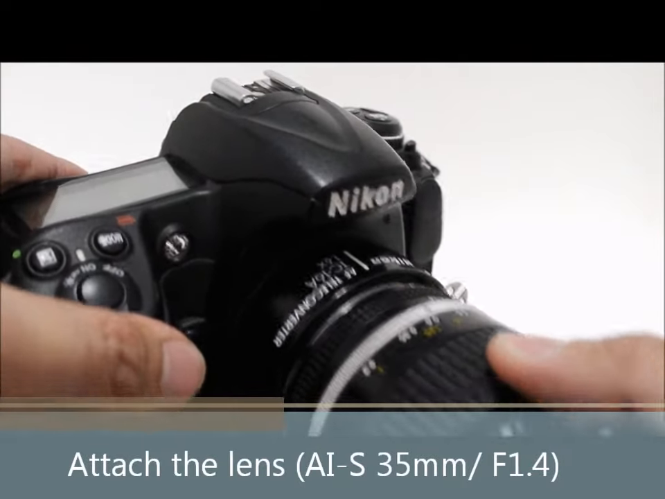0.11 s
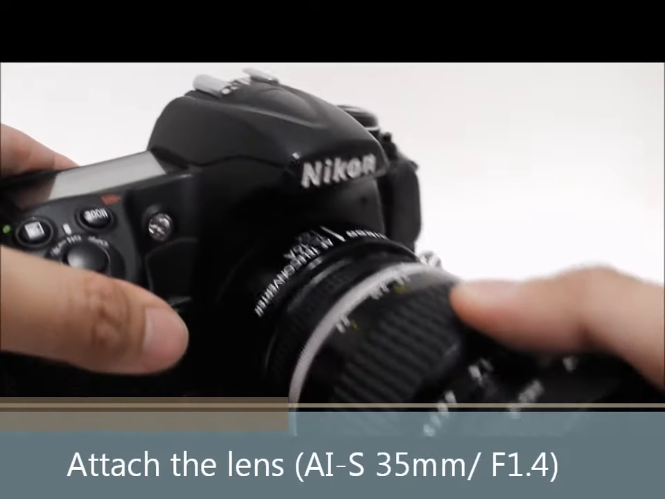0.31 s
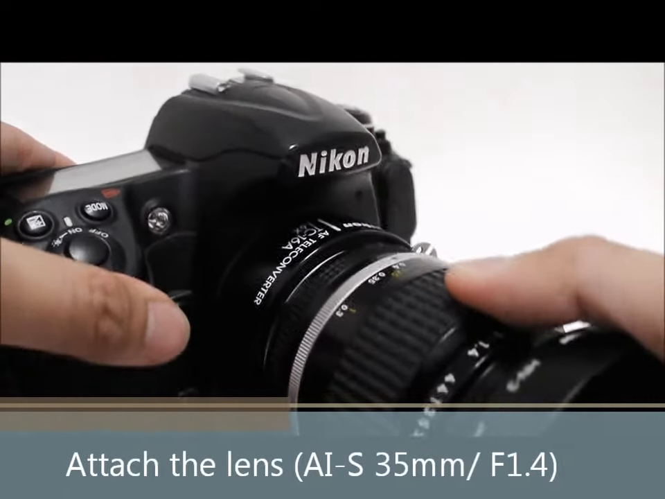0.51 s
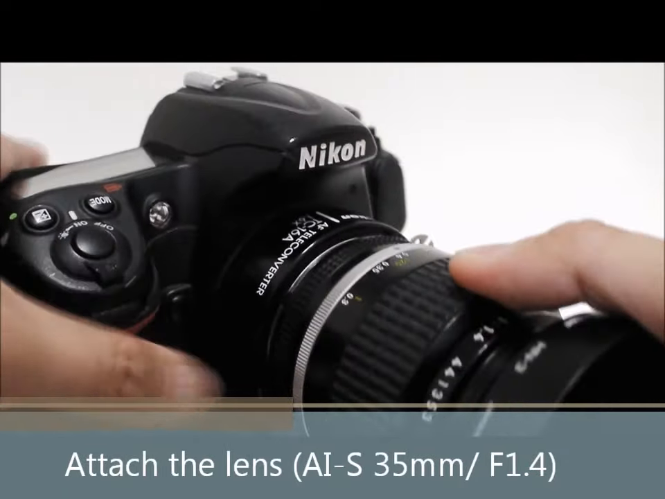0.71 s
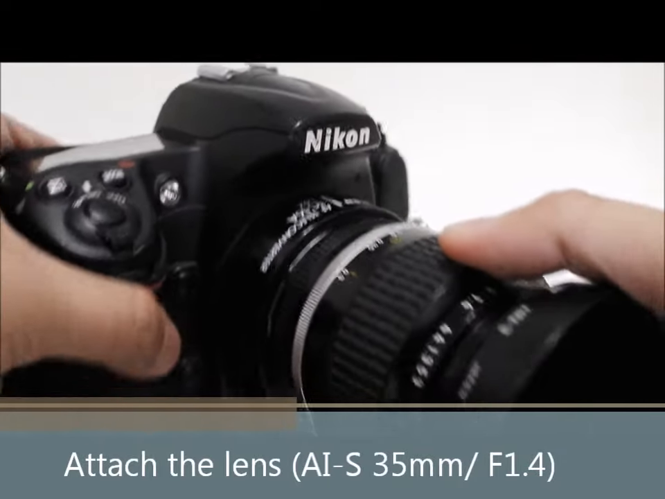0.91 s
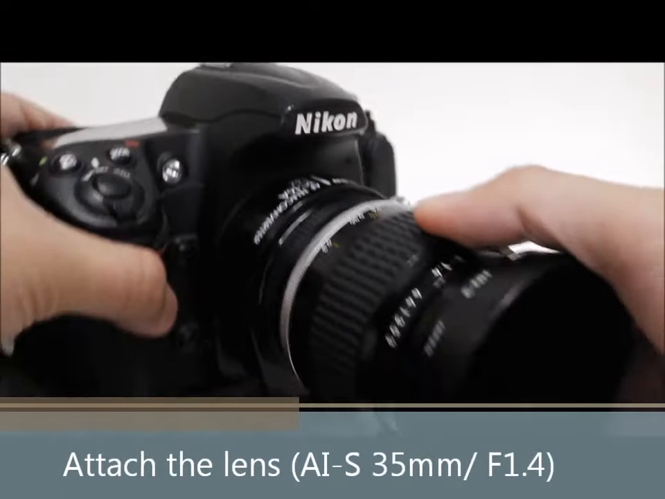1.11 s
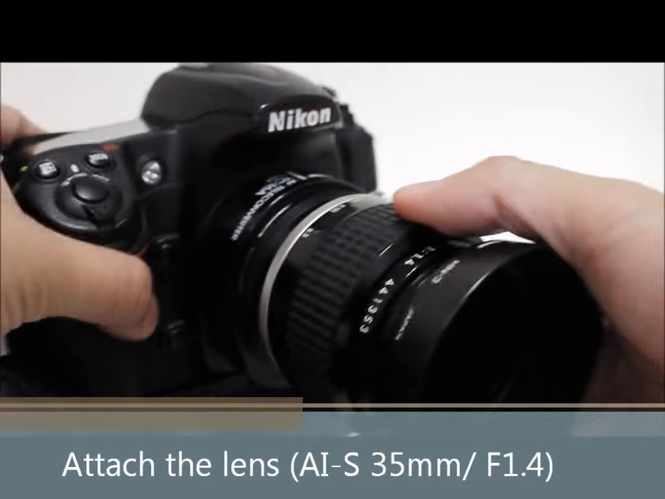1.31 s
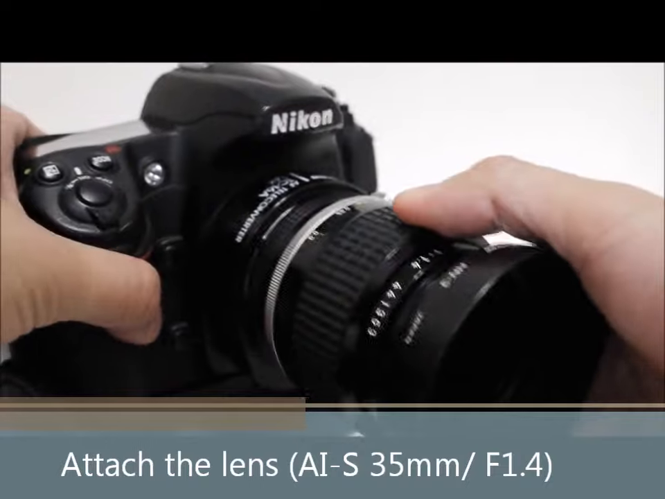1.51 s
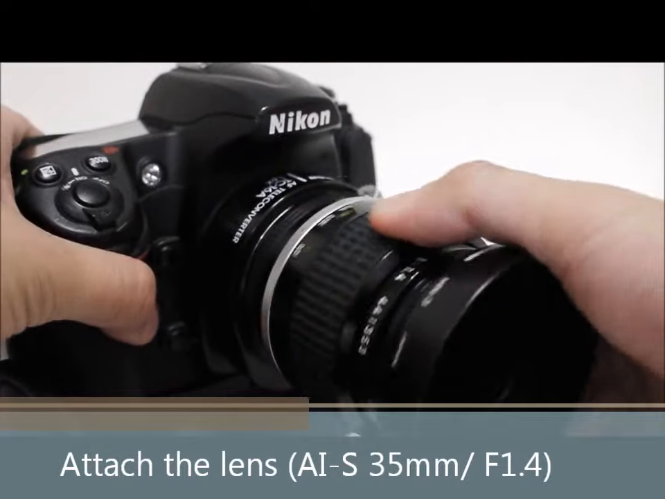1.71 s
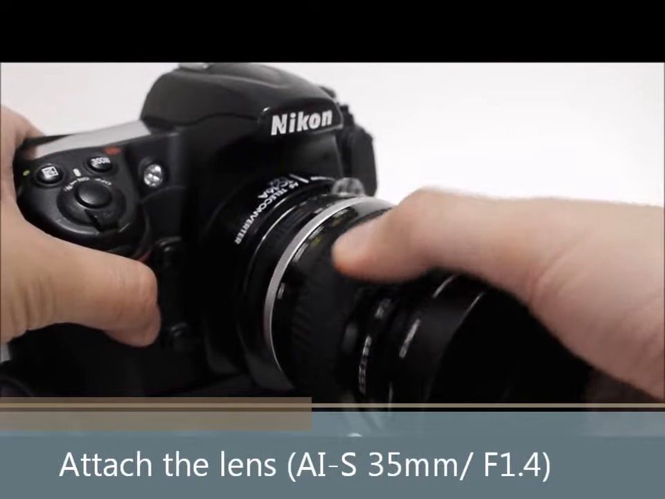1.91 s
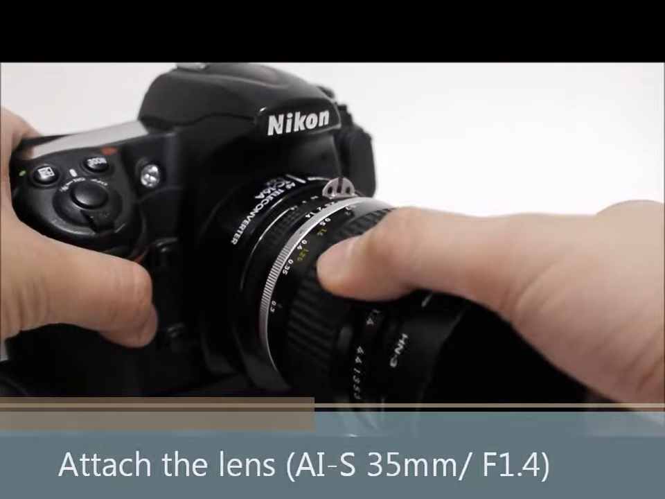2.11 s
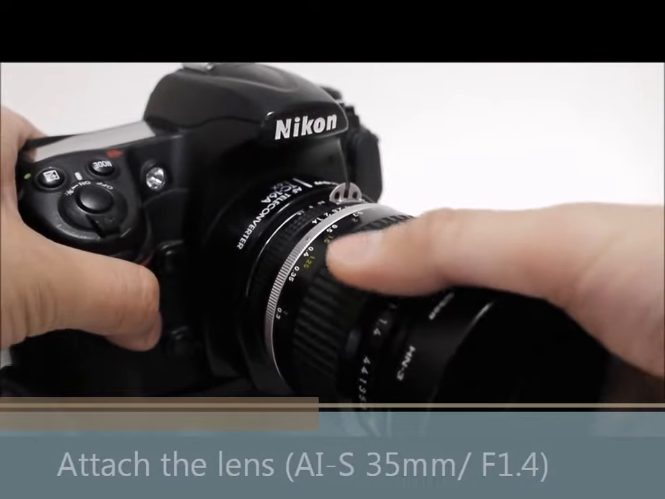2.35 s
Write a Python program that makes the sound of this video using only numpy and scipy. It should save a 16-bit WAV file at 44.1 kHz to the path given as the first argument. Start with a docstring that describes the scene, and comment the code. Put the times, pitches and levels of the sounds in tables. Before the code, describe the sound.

A metal camera lens meets its mount with a loud sharp clack, then faint ticks, a short gritty twisting scrape, a latch click and a final stop click, close-miked in a small quiet room.

```python
"""Short chattering clicks of metal parts meeting, as a lens is seated on a camera's bayonet mount and twisted home.
Each click is an enveloped flurry of impacts, filtered by its part, plus decaying body modes and a room echo.
The flange and then a ring scrape as they turn: filtered stick-slip noise, with short bright swells of scraping.
Fingers shift their grip on the housing in dull resonant rubs of the same friction noise.
Behind them lies the soft hiss of a small quiet room: steady filtered noise."""
import sys
import numpy as np
from scipy import signal
from scipy.fft import rfft, irfft
from scipy.io import wavfile
from scipy.ndimage import uniform_filter1d, map_coordinates

SR = 44100
rng = np.random.default_rng(int(sys.argv[2]) if len(sys.argv) > 2 else 0)


def file_out(sig):
    """Save sig as 16-bit WAV at sys.argv[1]."""
    # one column per channel
    cols = np.atleast_2d(sig).T
    # limit, then scale
    lim = np.clip(cols, -1, 1)
    pcm = np.round(lim * 32767).astype(np.int16)
    wavfile.write(sys.argv[1], SR, pcm)


N = 110250
T = np.arange(N) / SR

# impacts of the parts: (time [s], part, level [dB], rise [ms], hold [ms], decay to 1/e [ms],
# body ring re impact [dB], room echo re impact [dB])
IMPACTS = [(.2118, "edge", -37.5, 2.8, 2.1, 0.89, -9, 2), (0.2175, "flange", -18, 1.37, 0.11, 2.4, -7, -13),
           (.2222, "flange", -32.5, 0.62, 2.4, 3.3, -10, -3),
           (0.4835, "edge", -50.5, 0.49, 2.7, 3.2, -35, -23),
           (0.5545, "barrel", -55, 1.3, 1.2, 4.1, -20, -26),
           (0.5635, "edge", -52.5, 0.89, 1.4, 1.2, -24, -22),
           (0.6180, "lug", -48.5, 1.1, 2.2, 6.4, -31, -7),
           (0.6557, "barrel", -49, 1.2, 3.6, 4.4, -36, -3.5),
           (0.714, "housing", -46.5, 2.2, 3.6, 5.7, -30, -3.5),
           (1.1833, "latch", -36, 0.78, 0.52, 4.4, -11.5, -5),
           (1.3254, "housing", -45.5, 2.46, 0.98, 2.16, -3, 1.5),
           (1.3345, "barrel", -47.5, 0.85, 3.2, 1.1, -29, -2),
           (1.4552, "edge", -56.5, 0.78, 1.7, 3.1, -14, -17),
           (1.5748, "ring", -54.5, 0.95, 2.1, 2.1, -20, -0.5),
           (1.7888, "ring", -37.5, 1.1, 1.18, 2.9, -18, -3.5),
           (2.2042, "stop", -33, 1.7, 0.81, 2.55, -7.5, -2),
           (2.2596, "pin", -42, 1.06, 1.6, 0.93, -23, -8.5)]
# relative spectral density of each part's impact: part -> (frequency [Hz], level [dB])
IMPACT_COLOURS = { "flange": [(90, -20), (180, -17), (400, -0.5), (620, -6.5), (1100, -3), (1600, 3.5),
                  (1950, 4), (2250, -12), (2660, -2.5), (3100, -10), (4800, -17), (6800, -11), (7700, -15),
                  (10800, -10.5), (15300, -16.5)], "latch": [(150, -31), (450, -2), (720, 6), (966, 2),
                  (2100, -2), (3160, -7), (4140, -11.5), (6900, -13), (9900, -11.5), (15500, -29)],
                  "ring": [(100, -17), (250, -0.5), (900, -2.5), (3300, 0), (7400, -8), (11000, -14.5),
                  (15500, -14)], "stop": [(80, -30), (200, -2), (446, -3), (700, -3), (980, 5), (1340, -9),
                  (1750, -1.5), (2700, -12), (3500, -9), (5380, -14), (8300, -17.5), (15500, -40)],
                  "lug": [(150, -28), (800, -10), (2000, 5.5), (7700, -6.5), (9600, -3.5), (15500, -13)],
                  "pin": [(150, -17), (1900, 4.5), (2750, -6), (3400, 4.5), (5800, -10), (8300, -12.5),
                  (15500, -25)], "edge": [(150, -13), (550, -9), (1700, -3), (3100, -2.5), (5500, -5),
                  (9000, -17), (15500, -18)], "barrel": [(150, -25), (400, -9), (850, 1.5), (1700, -6.5),
                  (3000, -11), (6000, -35), (15500, -29)], "housing": [(150, -18), (400, -2), (900, 10.5),
                  (1800, 1), (2800, -6.5), (4500, -6), (5400, -34), (15500, -34)]}
# resonances of each part: part -> (frequency [Hz], width [Hz], rise [dB])
PART_RESONANCES = { "flange": [(412, 70, 6), (522, 60, 6), (778, 80, 9), (6676, 180, 7), (7220, 160, 8),
                   (10840, 300, 5)], "latch": [(710, 70, 9), (1490, 260, 9), (4820, 300, 13),
                   (6900, 550, 10)], "ring": [(3380, 160, 6), (6220, 300, 13), (8750, 250, 7),
                   (9950, 160, 11)], "stop": [(935, 100, 6), (1820, 260, 9), (2300, 170, 8),
                   (3330, 260, 10), (3830, 200, 5.5), (4560, 300, 9)], "lug": [(3350, 300, 14),
                   (4750, 300, 7), (5420, 300, 8), (6340, 280, 8)], "pin": [(1760, 160, 8), (3860, 90, 10)],
                   "edge": [(880, 200, 13), (1670, 180, 7), (3320, 200, 6), (5450, 250, 5)],
                   "barrel": [(1020, 140, 4), (2300, 250, 4)], "housing": [(2310, 180, 11), (2800, 160, 8),
                   (3300, 220, 11), (4420, 400, 9)]}


def clicks(size=16384):
    """Impact excitation: each contact force drives its part, with body modes and a diffuse echo added."""
    out = np.zeros(N + size)
    t = T[:size]
    ms = t * 1000
    for start_s, part, db, rise, hold, decay, ring_db, room_db in IMPACTS:
        attack = np.minimum(ms / rise, 1)
        env = attack * np.exp(-np.maximum(ms - rise - hold, 0) / decay)
        hit = unit(colour(chatter(env), IMPACT_COLOURS[part], PART_RESONANCES[part]))
        ring = body(t)
        echo = unit(signal.fftconvolve(hit, room())[:size])
        start = int(start_s * SR)
        strength = undb(db) * np.sqrt(np.mean(env ** 2))
        out[start:start + size] += strength * (hit + undb(ring_db) * ring + undb(room_db) * echo)
    return out[:N]


def chatter(env, count=5):
    """Repeated micro-impact: a flurry of similar strength under an envelope, nearly white in spectrum."""
    x = env * rng.standard_normal(len(env))
    for _ in range(count):
        # flatten the spectrum, then even out the local level
        z = rfft(x)
        x = irfft(z / (np.abs(z) + 1e-12), len(env))
        local_rms = np.sqrt(np.abs(uniform_filter1d(x ** 2, size=32)) + 1e-18)
        x = env * np.tanh(.5 * x / local_rms)
    return x


BUILD_CYCLES = 1.05  # build-up time constant, in cycles of each mode
# modes of camera and lens: (frequency [Hz], relative level [dB], T60 [s])
BODY_MODES = [(154, -8.5, .26), (250, -7, .22), (322, -4, .16), (415, 1, .14), (467, -5, .12),
              (529, -1, .13), (690, -4, .1), (777, 4.5, .12), (931, -6, .12), (1200, -4, .1),
              (1441, -1, .1), (1502, -2, .1), (1663, -2, .09), (1869, -6, .07), (1993, -2, .065)]


def body(t):
    """Modal superposition: each mode swells over its first cycles, then decays exponentially."""
    total = 0
    for hz, db, t60 in BODY_MODES:
        tone = np.sin(2 * np.pi * (hz * t + rng.random()))
        build = 1 - np.exp(-hz * t / BUILD_CYCLES)
        total = total + undb(db) * tone * build * np.exp(-np.log(1000) * t / t60)
    return unit(total)


TWIST_DB, TURN_DB = -3.5, -1  # gains added to the two stroke curves
# flange sliding round in the mount, before TWIST_DB: (time [s], level [dB])
TWIST_STROKE = [(.76, -64), (.82, -55), (.905, -49), (.946, -40.5), (.99, -50.5), (1.04, -47), (1.12, -45),
                (1.178, -50), (1.205, -69)]
# relative spectral density of the flange's scrape: (frequency [Hz], level [dB])
TWIST_SPECTRUM = [(100, -47), (160, -30), (300, -8), (490, -10.5), (751, 4), (1220, -3.5), (3160, -2),
                  (4100, -7.5), (6300, -9.5), (15500, -22.5)]
# resonances that the sliding excites: (frequency [Hz], width [Hz], rise [dB])
TWIST_RESONANCES = [(730, 180, 4), (915, 33, 7), (2460, 130, 5.5), (3210, 190, 4)]
# ring turning on the barrel, before TURN_DB: (time [s], level [dB])
TURN_STROKE = [(1.55, -80), (1.70, -64), (1.81, -59.5), (1.88, -52.5), (1.925, -55), (1.955, -69)]
# relative spectral density of the ring's scrape: (frequency [Hz], level [dB])
TURN_SPECTRUM = [(200, -12.5), (800, -5.5), (1600, 4), (2500, 3.5), (3500, 4), (5000, 2.5), (6700, -1.5),
                 (8000, -3), (11000, -4), (15500, -11)]
# resonances of the turning ring: (frequency [Hz], width [Hz], rise [dB])
TURN_RESONANCES = [(2480, 350, 6), (6700, 670, 4.5)]
# short bright swells of metal scraping, in the ring's colour; the one at .905 s brightens
# the flange's slide: (time [s], length [s], level [dB])
BRIGHT_SWELLS = [(.615, 0.092, -63), (.817, 0.0075, -55), (.905, 0.13, -52.5), (2.27, 0.11, -63)]


def scrapes():
    """Friction-excited resonance: the flange grinds in the mount, the ring turns lightly, bright swells join."""
    twist = drift(colour(friction(), TWIST_SPECTRUM, TWIST_RESONANCES))
    bright = drift(colour(friction(), TURN_SPECTRUM, TURN_RESONANCES))
    bright_gain = stroke(TURN_STROKE) * undb(TURN_DB) + swells(BRIGHT_SWELLS)
    return twist * stroke(TWIST_STROKE) * undb(TWIST_DB) + bright * bright_gain


CATCHES_PER_S, CATCH_SPREAD_DB = 1100, 4  # mean rate; mean of the exponential spread before its cap
SMOOTH_SHARE = 0.78  # share of the power in smooth sliding
JUDDER_HZ, JUDDER_DB = 108, 1.05  # unevenness of the hand's pressure: new values per second, spread


def friction():
    """Stick-slip: dense uneven catches over smooth sliding noise, both juddering with the pressure."""
    caught = rng.random(N) < CATCHES_PER_S / SR
    size_db = CATCH_SPREAD_DB * np.minimum(rng.exponential(size=N), 4)
    catches = caught * rng.choice([-1, 1], N) * undb(size_db)
    smooth = rng.standard_normal(N)
    judder = np.interp(T * JUDDER_HZ, np.arange(N), rng.standard_normal(N))
    mix = np.sqrt(1 - SMOOTH_SHARE) * unit(catches) + np.sqrt(SMOOTH_SHARE) * smooth
    return mix * undb(JUDDER_DB * judder)


DRIFT_HZ, DRIFT_SHARE = 22, .03  # new values per second; spread as a fraction of the frequency


def drift(x):
    """Frequency modulation by time warping: resonances wander as the point of contact moves."""
    speed = 1 + DRIFT_SHARE * np.interp(T * DRIFT_HZ, np.arange(N), rng.standard_normal(N))
    return map_coordinates(x, [np.cumsum(speed)], mode="mirror")


def stroke(curve):
    """Amplitude envelope: gain along (time [s], level [dB]) points, at -120 dB outside them."""
    p = np.array(curve)
    return undb(np.interp(T, p[:, 0], p[:, 1], left=-120, right=-120))


def swells(rows):
    """Amplitude envelope: short swells, each rising and falling as a half sine."""
    total = 0
    for start_s, length_s, db in rows:
        total = total + undb(db) * np.sin(np.pi * np.clip((T - start_s) / length_s, 0, 1))
    return total


GRIP_WIDTH_HZ, GRIP_RISE_DB = 130, 14  # of each rub's resonance
# fingers shifting on the housing: (time [s], length [s], level [dB], resonance [Hz])
GRIP_SHIFTS = [(0.203, 0.014, -52.5, 416), (1.233, 0.045, -55, 430), (1.422, 0.086, -59, 270),
               (1.587, 0.07, -59, 990), (1.70, 0.064, -61.5, 278), (2.281, 0.026, -60, 265)]
# relative spectral density of skin on the housing: (frequency [Hz], level [dB])
GRIP_SPECTRUM = [(80, -30), (170, -6), (450, -4), (1800, -12), (6000, -36)]


def fingers():
    """Friction through a resonator: dull rubs of skin, each with its own hollow resonance."""
    total = 0
    for start_s, length_s, db, hz in GRIP_SHIFTS:
        rub = friction() * swells([(start_s, length_s, db)])
        total = total + colour(rub, GRIP_SPECTRUM, [(hz, GRIP_WIDTH_HZ, GRIP_RISE_DB)])
    return total


ROOM_DELAY_S, ROOM_BUILD_S = 0.00037, 0.0032
# reverberation bands: (centre [Hz], T60 [s], relative level [dB])
ROOM_BANDS = [(150, 0.18, 5), (387, 0.21, 4.5), (920, 0.14, 3.5), (1990, 0.18, -1), (4000, 0.18, -1),
              (8000, 0.19, 1), (15200, 0.16, 2.5)]


def room(size=16384):
    """Diffuse reverberation: a unit-energy noise response whose bands decay at their own rates."""
    t = T[:size]
    hz = np.arange(size // 2 + 1) * SR / size + 1
    noise = rfft(rng.standard_normal(size))
    centres = np.log([row[0] for row in ROOM_BANDS])
    out = 0
    for (_, t60, db), pick in zip(ROOM_BANDS, np.eye(len(ROOM_BANDS))):
        band = irfft(noise * np.interp(np.log(hz), centres, pick))  # triangular band on a log axis
        out = out + undb(db) * band * np.exp(-np.log(1000) * t / t60)
    out = out * np.clip((t - ROOM_DELAY_S) / ROOM_BUILD_S, 0, 1)
    return out / np.sqrt(np.sum(out ** 2))


HISS_DB = -61
WHINE_HZ, WHINE_WIDTH_HZ, WHINE_DB = 13550, 440, 3  # a narrow rise in the hiss
# relative spectral density of the hiss: (frequency [Hz], level [dB])
HISS_SPECTRUM = [(25, -33.5), (140, -22.5), (200, -13), (390, -9.5), (640, -9), (735, -4), (830, -9),
                 (1250, -10), (2000, -15), (3300, -18.5), (7000, -24.5), (15800, -31.5)]


def air():
    """Stationary filtered noise: the steady room hiss."""
    noise = rng.standard_normal(N)
    return undb(HISS_DB) * colour(noise, HISS_SPECTRUM, [(WHINE_HZ, WHINE_WIDTH_HZ, WHINE_DB)])


def colour(x, points, rings=()):
    """Minimum-phase filtering: a causal unit-power response through the points, with resonances on top."""
    hz = np.arange(len(x) // 2 + 1) * SR / len(x) + 1  # 1 Hz up, to keep the logarithm finite
    p = np.array(points, float)
    db = np.interp(np.log(hz), np.log(p[:, 0]), p[:, 1])
    for f, width, rise in rings:
        db = db + rise / (1 + (2 * (hz - f) / width) ** 2)
    # folding the cepstrum onto positive time makes the filter causal
    cepstrum = irfft(np.log(unit(undb(db))), len(x))
    cepstrum[1:len(x) // 2] *= 2
    cepstrum[len(x) // 2 + 1:] = 0
    return irfft(rfft(x) * np.exp(rfft(cepstrum)), len(x))


def undb(db):
    """Logarithmic level: decibels to amplitude gain."""
    return 10 ** (np.asarray(db) / 20)


def unit(x):
    """Power normalization: scale to rms 1."""
    return x / np.sqrt(np.mean(x ** 2))


def scene():
    """Linear superposition: all sources summed into one channel."""
    return (clicks() + scrapes() + fingers() + air())[None]


LOW_CUT_HZ, TOP_HZ = 125, 15600


def record(dry):
    """Band limiting: a gentle high-pass thins the bass and an elliptic low-pass cuts the top steeply."""
    high_pass = signal.butter(2, LOW_CUT_HZ, "high", fs=SR, output="sos")
    low_pass = signal.ellip(10, .2, 80, TOP_HZ, fs=SR, output="sos")  # ripple, stopband [dB]
    return signal.sosfilt(low_pass, signal.sosfilt(high_pass, dry))


dry = scene()
out = record(dry)
file_out(out)
```